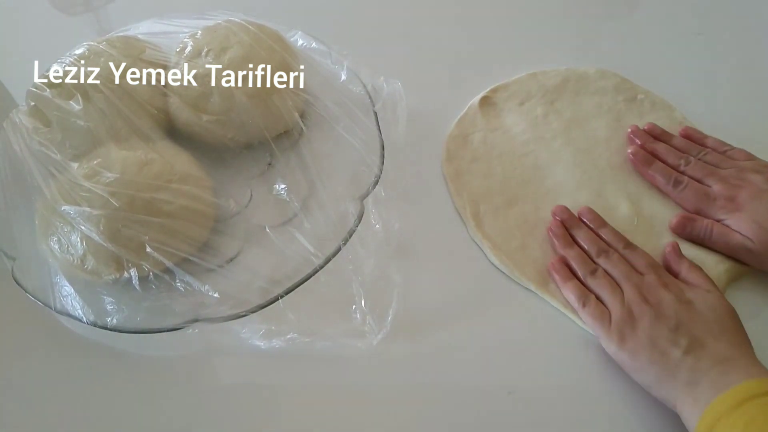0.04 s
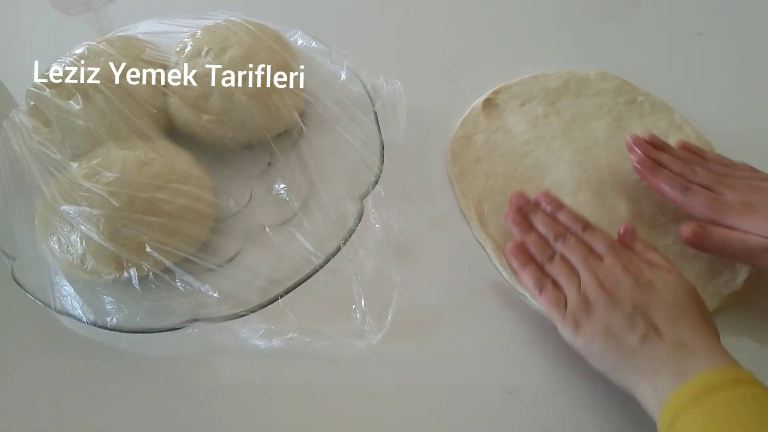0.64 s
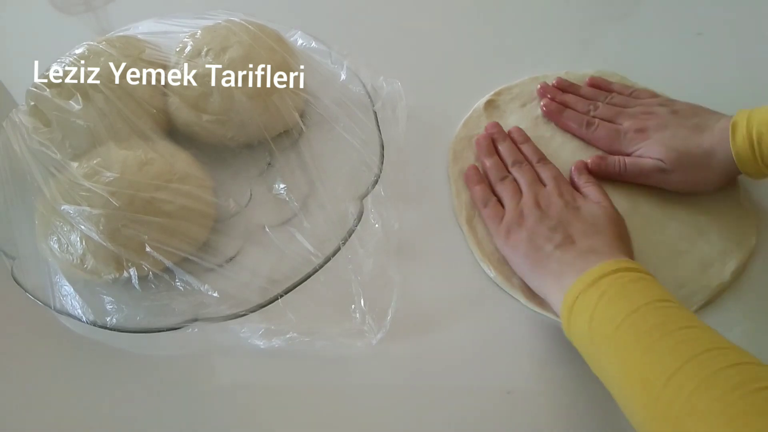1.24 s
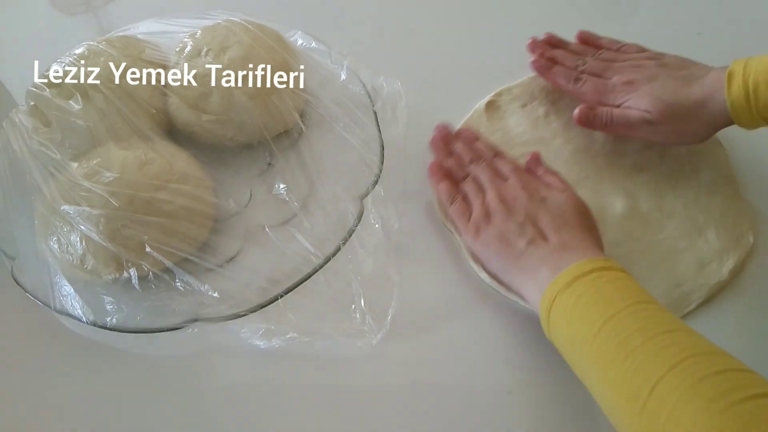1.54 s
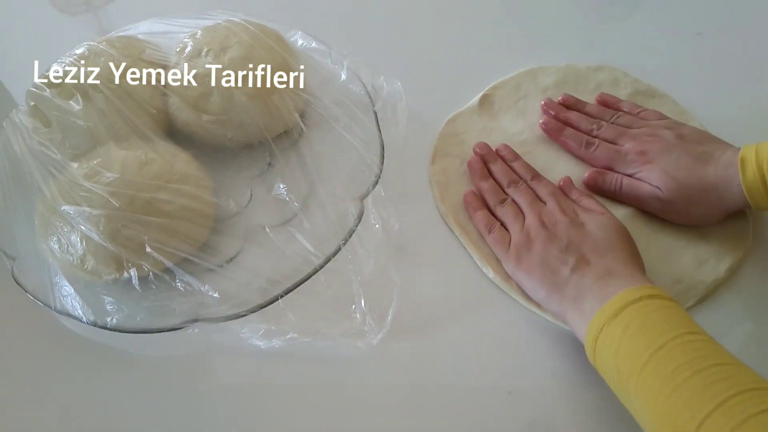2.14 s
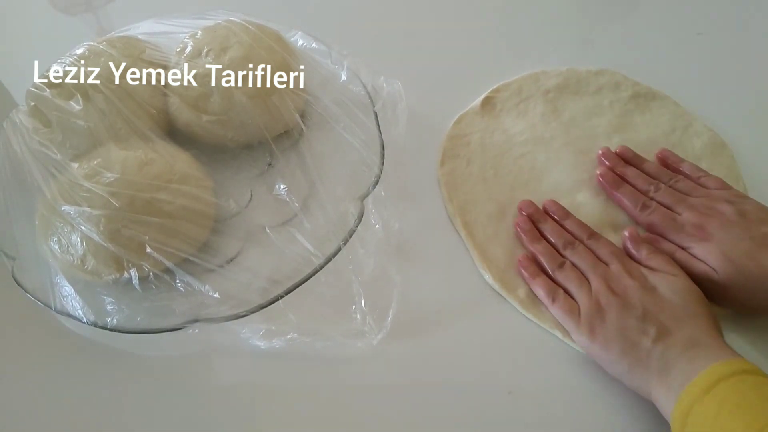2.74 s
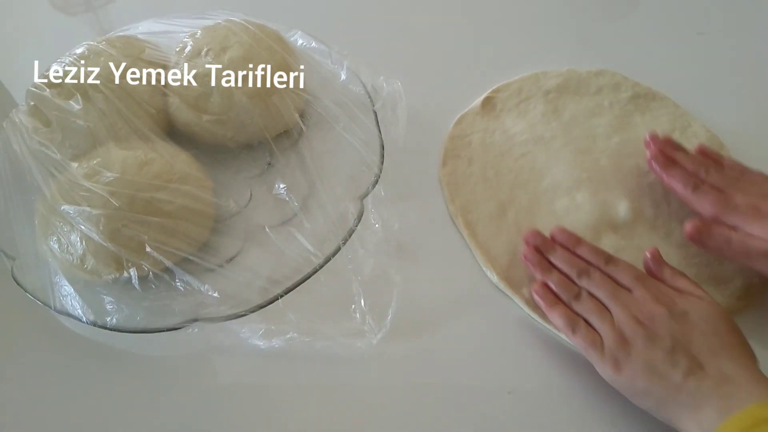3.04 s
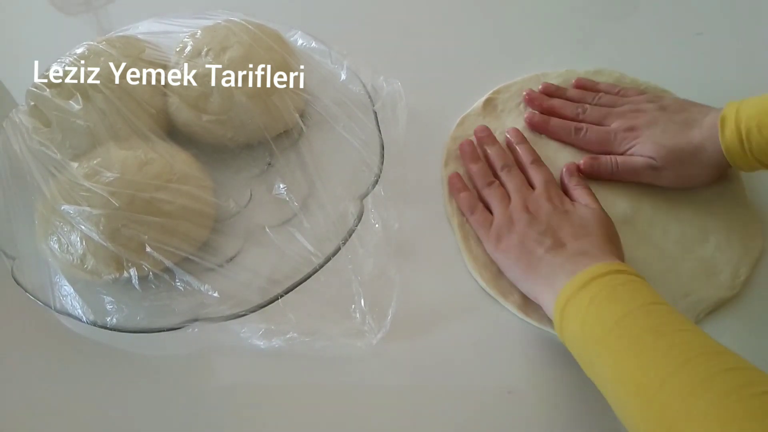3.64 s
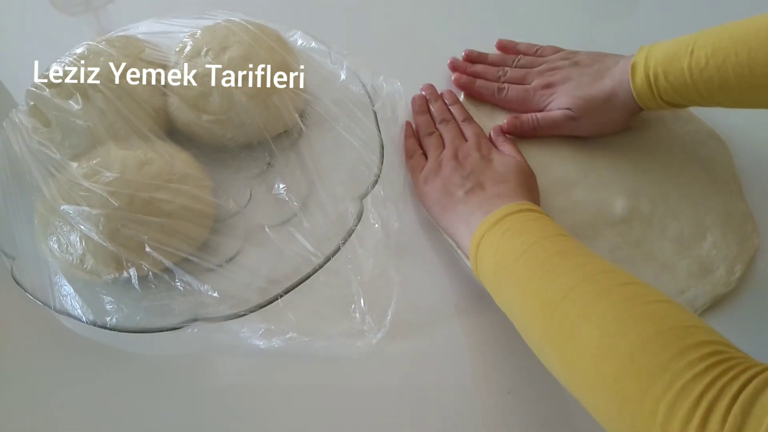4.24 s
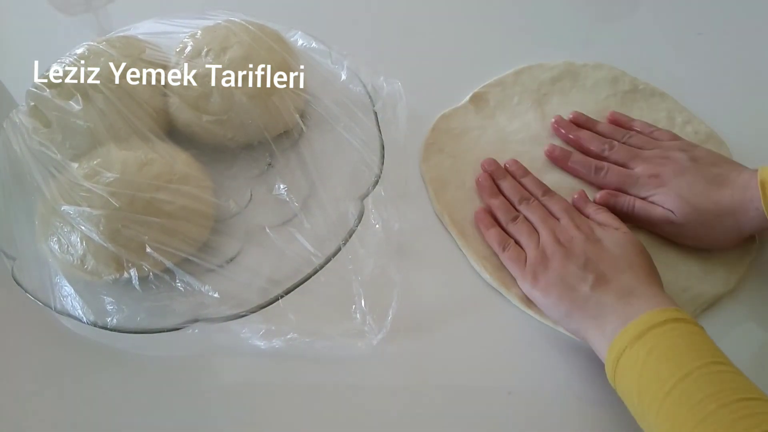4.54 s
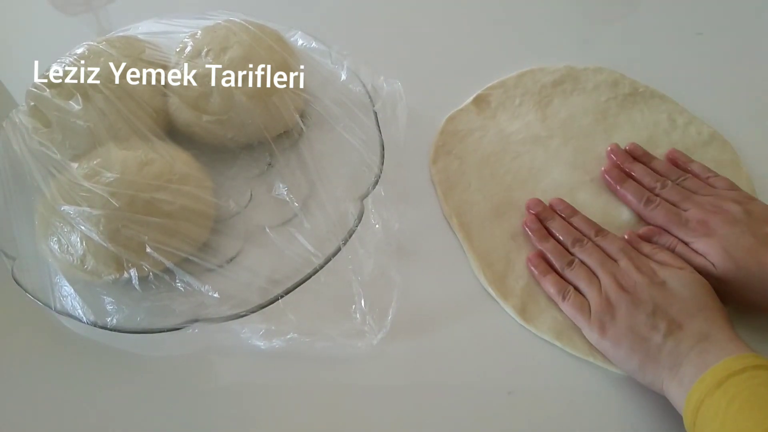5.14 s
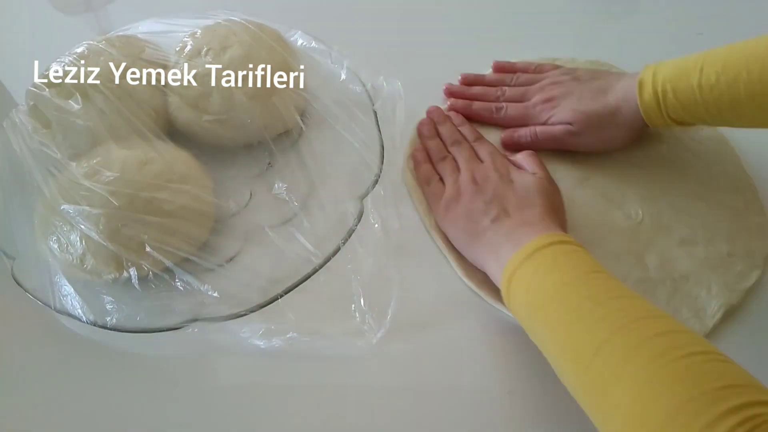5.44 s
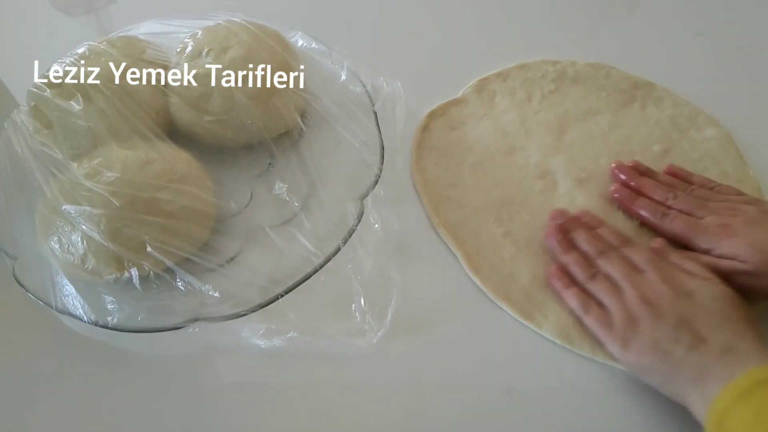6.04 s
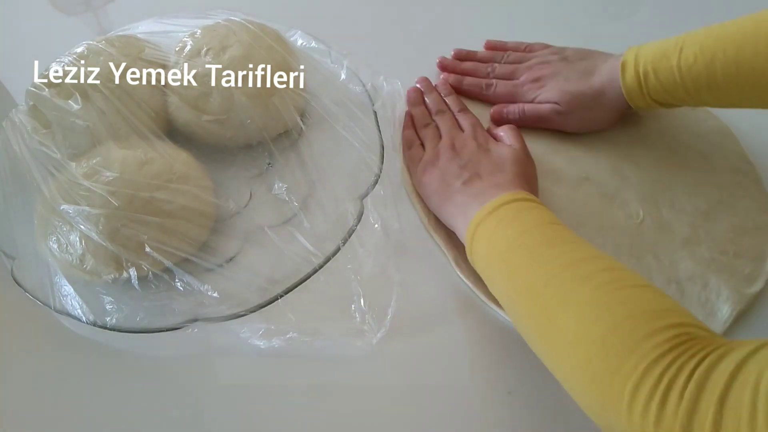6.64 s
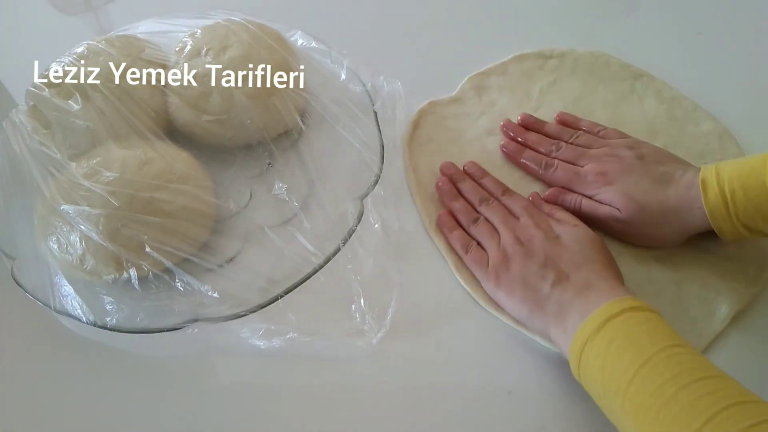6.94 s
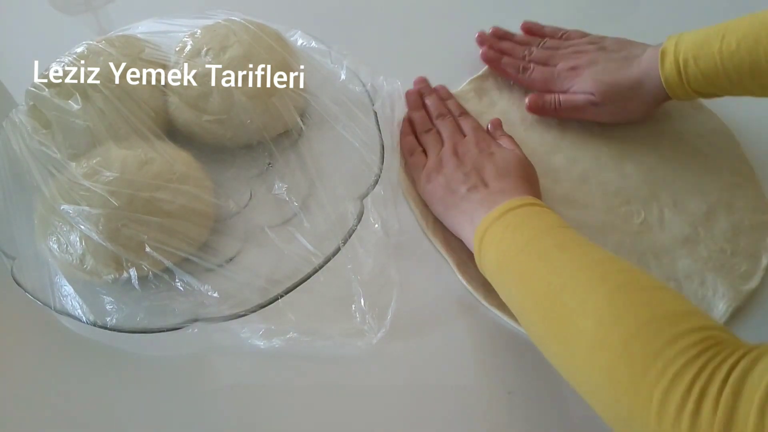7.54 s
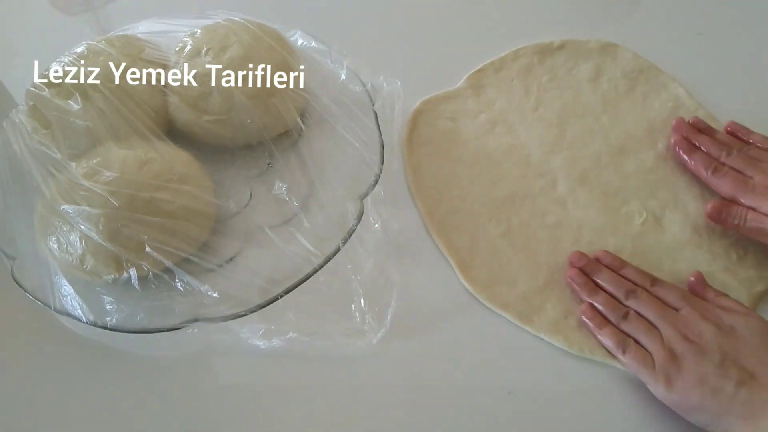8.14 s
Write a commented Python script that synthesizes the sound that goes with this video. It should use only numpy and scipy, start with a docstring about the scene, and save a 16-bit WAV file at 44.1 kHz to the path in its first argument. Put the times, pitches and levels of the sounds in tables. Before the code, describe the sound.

Close to the microphone, palms and fingers press and slap greasy dough in a small, quiet kitchen with a faint hum. Soft thumps and wet smacks come unevenly, about two a second, mixed with little pops, sticky crackles and a faint rub of skin on oil. About two thirds through, the patting turns quick and drier, then finishes with a few lighter pats and a last peel of the fingers.

```python
"""Two hands pat a round of oiled dough flat on a kitchen worktop, close up, over faint air and mains hum.
Slow pats come first: each a soft thud that sets worktop and room ringing, with a smack where the
fingers land; in full pats the palm follows. In between, skin slides on the oil, tiny air pockets snap
and sticky fingers peel off. At about 5.5 s the background dips briefly, then the pats come twice as
fast and sound drier, ending in a few light ones and a last peel."""
import sys
import numpy as np
from scipy import signal
from scipy.fft import rfft, irfft
from scipy.io import wavfile
from scipy.ndimage import uniform_filter1d

SR = 44100
rng = np.random.default_rng(int(sys.argv[2]) if len(sys.argv) > 2 else 0)


def bounce(signal):
    """Save signal as a 16-bit WAV file at the path given by the first command-line argument."""
    frames = np.transpose(np.atleast_2d(signal))
    limited = np.clip(frames, -1, 1)
    pcm = np.round(limited * 32767).astype(np.int16)
    wavfile.write(sys.argv[1], SR, pcm)


N = 369999

# fingers landing on the dough: (time [s], thud [dB], knock [dB], smack [dB], hollow under the hand [dB],
# pitch of the squeezed air [Hz], brightness [dB/octave])
PATS = [(0.3415, -30, -34.5, -29.5, -35, 1610, -2.5), (0.763, -33.5, -57, -35.5, -44, 3170, -3.5),
        (1.2455, -23, -32, -37, -43.5, 1840, 1.5), (1.6669, -34.5, -50.5, -41, -59.5, 3360, -1.5),
        (2.147, -46, -59.5, -49.5, -61.5, 1300, -3), (2.6689, -44.5, -64, -59, -52, 5180, 5.5),
        (3.2166, -35.5, -41, -46.5, -51.5, 1830, -3.5), (3.664, -26, -41, -40.5, -54, 2430, -5),
        (4.044, -41.5, -59, -55.5, -57.5, 3830, 2), (5.1661, -40.5, -54.5, -47.5, -47.5, 4540, -3),
        (5.491, -52, -58, -88, -62.5, 1450, -5), (5.677, -40.5, -49.5, -55, -73, 1290, -7.5),
        (5.862, -35, -41, -38.5, -41.5, 2030, 0.5), (6.0882, -35.5, -48, -39, -49, 1470, 2),
        (6.2831, -27, -38, -38.5, -38.5, 3160, -3.5), (6.4417, -29.5, -39, -34, -47.5, 1610, 5),
        (6.6312, -34.5, -46.5, -44.5, -50, 2700, -3), (6.8015, -28, -42, -30.5, -34, 2980, -5.5),
        (6.98, -37, -50.5, -43.5, -54.5, 2440, -7), (7.2294, -32.5, -51.5, -43, -55, 4130, 0),
        (7.4028, -36.5, -44.5, -42, -54, 2120, -3), (7.6075, -47, -50.5, -52, -53.5, 2480, 0),
        (7.818, -39, -50.5, -50, -56, 1440, -0.5), (8.028, -39, -52.5, -49, -64, 1380, -2),
        (8.2556, -38, -41, -48.5, -56, 1550, -2)]
QUICK_FROM_S = 5.47  # the quick, drier pats start here


def amp(db):
    """Decibels to gain."""
    return 10 ** (np.asarray(db) / 20)


def unit(x):
    """Scales to an energy of 1."""
    return x / np.sqrt(np.sum(x ** 2) + 1e-20)


def curve(points, hz):
    """Reads a table along a log-frequency axis."""
    point_hz, value = np.transpose(points)
    return np.interp(np.log(hz + 1), np.log(point_hz + 1), value)


def bump(hz, centre, width):
    """A resonance of height 1 on a log-frequency axis."""
    return 1 / (1 + (np.log((hz + 1) / centre) / width) ** 2)


def add(mix, s, sound):
    """Mixes a sound in at time s."""
    start = round(s * SR)
    sound = sound[max(-start, 0):]
    part = mix[max(start, 0):][:len(sound)]
    part += sound[:len(part)]


def colour(x, gain_db):
    """Minimum-phase EQ: the ring follows each click and never precedes it."""
    log_gain = np.log(amp(np.r_[gain_db, gain_db[-2:0:-1]]))
    response = np.exp(np.conj(signal.hilbert(log_gain)))[:len(gain_db)]
    return irfft(rfft(x) * response, len(x))


def room_tone(air_db=-80, dip_s=5.48, dip_db=-16, recovery_s=0.054):
    """Still air and a faint mains hum; both dip briefly as the quick pats begin."""
    # colour of the room air: (frequency [Hz], gain [dB])
    air_eq = [(25, 1), (55, 18.5), (110, 7), (250, 1), (450, 2), (1500, -2), (3000, -4.5), (6000, -8),
              (12500, -10.5), (13500, -18), (16000, -23)]
    # partials of the hum: (frequency [Hz], level [dB])
    partials = [(98, -90), (146, -86.5), (194, -94.5), (243, -89.5), (291, -93.5)]
    hz, t = np.fft.rfftfreq(N, 1 / SR), np.arange(N) / SR
    air = irfft(rfft(rng.standard_normal(N)) * amp(curve(air_eq, hz)), N)
    hum = sum(np.sqrt(2) * amp(db) * np.sin(2 * np.pi * (f * t + rng.random())) for f, db in partials)
    dip = (t > dip_s) * np.exp(-abs(t - dip_s) / recovery_s)
    return amp(dip_db * dip) * (hum + amp(air_db) * air / air.std())


def creases(hz, count=26):
    """Small chance resonances of the folds between the fingers, in dB."""
    centre, height = rng.random((2, count, 1))
    ripple_db = ((18 * height - 9) * bump(hz, 1100 * 13 ** centre, .04)).sum(0)
    return np.minimum(ripple_db, 7)  # cap the random peaks so no narrow tone sticks out


def palm_slides(catch_db=4, grains_per_s=2500):
    """Skin gliding on oil: a fine high crackle that catches and lets go, each stroke its own colour."""
    # strokes over the dough: (middle [s], length [s], level [dB])
    strokes = [(0.17, 0.34, -82), (0.582, 0.11, -79.5), (1.068, 0.11, -70.5), (1.514, 0.24, -80.5),
               (1.93, 0.26, -76.5), (2.513, 0.085, -69.5), (2.924, 0.26, -78.5), (3.472, 0.18, -77),
               (3.889, .21, -71.5), (4.369, 0.14, -70), (4.973, 0.12, -68.5), (7.787, 0.11, -62),
               (8.149, 0.053, -69)]
    # colour of rubbing skin: (frequency [Hz], gain [dB])
    rub_eq = [(1500, -26), (3000, -11.5), (7000, -13.5), (11000, -3), (13000, 0), (14500, 1), (16000, -10)]
    out = np.zeros(N)
    for s, length, db in strokes:
        size = 2 * round(length * SR / 2)
        hz = np.fft.rfftfreq(size, 1 / SR)
        catches = uniform_filter1d(rng.standard_normal(size), 400)
        grains = rng.standard_normal(size) * (rng.random(size) < grains_per_s / SR)
        grains *= amp(catch_db * catches / catches.std())
        rustle = colour(grains, curve(rub_eq, hz) + creases(hz))
        add(out, s - length / 2, amp(db) * np.hanning(size) * rustle / rustle.std())
    return out


def push(t, hz, crest_s):
    """A heavily damped swing that builds while the dough yields."""
    u = t / crest_s
    return -u ** 2 * np.exp(2 * (1 - u)) * np.sin(2 * np.pi * hz * t)


def dough_thuds(lead_s=0.00398, usual_thud_db=-37.5, swell_s=0.036, slow_t60=0.43, quick_t60=0.24):
    """The hand's weight thuds through the dough; worktop and room swell after it and die away."""
    # a hand leaning on the dough with no smack: (time [s], thud [dB])
    presses = [(0.001, -53.5), (0.964, -55), (1.066, -48), (3.177, -49.5), (3.475, -54.5), (3.565, -57.5),
               (4.523, -55), (7.843, -36), (7.997, -42.5)]
    # low modes of worktop and room: (frequency [Hz], gain [dB], ring time [factor])
    modes = [(63.4, -15.5, 0.83), (79.8, -12, 0.99), (98.1, -9, 1.15), (123.67, -0.5, 0.79),
             (138.45, -9, 1.28), (189.9, 4.5, 0.68), (199.4, -7, 0.55), (222.1, -9.5, 0.9),
             (248.1, -7, 0.76), (287.4, -15.5, 0.7), (317.6, -18, 0.62), (363.8, -17, 0.46)]
    mode_hz, mode_db, lasting = np.transpose(modes)[:, :, None]
    # the dough starts to yield just before the skin closes on it
    landings = [(s - lead_s, thud, knock) for s, thud, knock, *_ in PATS]
    landings += [(s, thud, thud - 20) for s, thud in presses]  # a soft press barely knocks
    out, t = np.zeros(N), np.arange(SR) / SR
    for s, thud, knock in landings:
        weight_db = thud - usual_thud_db
        crest_s = 0.011 * 2 ** (weight_db / 45)  # a heavier hand sinks in for longer
        ring_db = 2.17 - 0.16 * weight_db  # and damps the ring more
        blow = amp(thud) * push(t, hz=108.3, crest_s=crest_s)
        blow += amp(thud / 2 - 44) * push(t, hz=46, crest_s=0.026)  # even a light pat sways the worktop
        blow += amp(knock + 3) * push(t, hz=205, crest_s=0.0068)
        # a flat soft hand feeds the lowest modes, a firmer one the upper; each spot a little differently
        drive_db = np.where(mode_hz < 160, thud, knock + 6) + 2.5 * rng.standard_normal(mode_hz.shape)
        t60 = (slow_t60 if s < QUICK_FROM_S else quick_t60) * lasting
        ring = (amp(drive_db + mode_db - 60 * t / t60) * np.sin(2 * np.pi * mode_hz * t)).sum(0)
        swell = 1 - np.exp(-(t / swell_s) ** 2)
        add(out, s, blow + amp(ring_db) * ring * swell)
    return out


def oil_bridges(contacts, *, skin_db, hollow_db, fizz_db, grains_per_s, grain_db, hiss,
                attack_ratio, halo, gap_db, gap_width, cup_db, crease_depth):
    """A swarm of tiny oil bridges breaking, coloured by the air gaps between skin and dough."""
    # midrange smack of the skin: (frequency [Hz], gain [dB])
    skin_eq = [(300, -39.5), (700, -10), (1000, 1.5), (1800, -0.5), (3100, -3), (4200, -5.5), (6000, -12),
               (10000, -41.5)]
    # low body of the hollow under the hand: (frequency [Hz], gain [dB])
    hollow_eq = [(120, -33.5), (260, 3.5), (380, 0), (560, -1.5), (800, -7), (1300, -21), (3000, -60.5)]
    # wet fizz on top: (frequency [Hz], gain [dB])
    fizz_eq = [(2000, -35.5), (4500, -11.5), (5600, 1), (8000, 5.5), (10500, 0.5), (12500, 3),
               (14500, -0.5), (16000, 3.5)]
    out, size = np.zeros(N), 8192
    t, hz = (np.arange(size) - size // 2) / SR, np.fft.rfftfreq(size, 1 / SR)
    for s, skin, hollow, fizz, hollow_hz, gap_hz, spread_s, tilt in contacts:
        # bridges break at random, a few of them large
        breaks = (rng.random(size) < grains_per_s / SR) * rng.choice([-1, 1], size)
        breaks = breaks * amp(grain_db * np.minimum(rng.exponential(1, size), 4))
        envelope = 1 / np.cosh(t / (spread_s * np.where(t < 0, attack_ratio, 1)))
        envelope += halo * np.exp(-abs(t) / 0.005)  # a faint swell softens the edges of short bursts
        swarm = (unit(breaks) + hiss * unit(rng.standard_normal(size))) * envelope
        folds_db = crease_depth * creases(hz)
        # the squeezed air rings at its pitch and, more weakly, at one overtone
        gap = bump(hz, gap_hz, gap_width) + .5 * bump(hz, 1.7 * gap_hz, gap_width / 2)
        skin_tone = curve(skin_eq, hz) + gap_db * gap + tilt * np.log2(hz + 1) + folds_db
        hollow_tone = curve(hollow_eq, hz) + cup_db * bump(hz, hollow_hz, width=0.34)
        sound = amp(skin + skin_db) * unit(colour(swarm, skin_tone))
        sound += amp(hollow + hollow_db) * unit(colour(swarm, hollow_tone))
        sound += amp(fizz + fizz_db) * unit(colour(swarm, curve(fizz_eq, hz) + folds_db))
        add(out, s + t[0], sound)
    return out


def pocket_snaps(hollow_hz=620, spread_s=0.0015):
    """Tiny air pockets all burst equally fast; their size sets the pitch."""
    # pockets snapping open: (time [s], level [dB], fizz [dB], pitch [Hz])
    snaps = [(0.035, -55.5, -74, 2750), (0.457, -49.5, -85, 1760), (1.0776, -29.5, -49.5, 2130),
             (3.9578, -50.5, -94, 1770), (4.7462, -35, -66, 2580), (4.8107, -30.5, -55.5, 3040),
             (4.934, -62.5, -67, 1700), (6.1765, -39.5, -96, 3120), (6.3838, -33, -64, 1070),
             (6.9073, -43.5, -65, 1520), (7.0279, -31, -47, 5040), (7.0794, -28.5, -51.5, 2700),
             (7.108, -71, -63, 3030), (8.085, -56, -72, 3170), (8.1302, -42, -70, 2560)]
    contacts = [(s, db, db - 21, fizz, hollow_hz, hz, spread_s, 0) for s, db, fizz, hz in snaps]
    return oil_bridges(
        contacts, skin_db=7, hollow_db=10.5, fizz_db=22, grains_per_s=3400, grain_db=-4, hiss=1,
        attack_ratio=0.77, halo=0.03, gap_db=15, gap_width=0.21, cup_db=23, crease_depth=0.6)


def finger_peels(hollow_hz=700):
    """Sticky fingers lift off with a sparse, pitched crackle and only a small, weak hollow."""
    # fingers leaving the dough: (time [s], level [dB], fizz [dB], air gap pitch [Hz], spread [s])
    peels = [(0.195, -66, -85, 1120, 0.01), (0.456, -55, -73, 1830, 0.013),
             (0.6074, -61.5, -76, 4760, 0.0069), (1.0904, -41.5, -58.5, 2380, 0.011),
             (1.5372, -61, -92, 1800, 0.011), (2.0155, -68.5, -84, 5100, 0.012),
             (2.5179, -55.5, -69, 1910, .01), (3.043, -54.5, -65.5, 1126, .0076),
             (3.485, -48.5, -59, 2070, 0.0069), (4.3799, -56, -65, 2170, 0.018),
             (4.561, -63, -91, 920, 0.017), (4.7655, -48.5, -64, 2330, 0.0094),
             (4.9903, -48, -66, 1780, 0.0077), (5.274, -57.5, -69, 3600, .005),
             (5.362, -61.5, -55.5, 2720, 0.023), (6.2148, -62.5, -79, 1710, .004),
             (6.39, -45.5, -52, 1800, 0.0081), (7.0369, -39, -50, 3220, 0.0045),
             (7.3526, -52, -63, 1290, 0.0068), (7.784, -60.5, -62, 4740, 0.0078),
             (7.859, -43, -58, 5480, 0.0053), (8.1303, -49, -59.5, 2840, 0.0091),
             (8.3684, -63.5, -69.5, 4830, 0.0058)]
    contacts = [(s, db, db - 14, fizz, hollow_hz, hz, spread, 0) for s, db, fizz, hz, spread in peels]
    return oil_bridges(
        contacts, skin_db=19, hollow_db=20.5, fizz_db=22, grains_per_s=800, grain_db=4.5, hiss=0.39,
        attack_ratio=0.81, halo=0.023, gap_db=21, gap_width=0.17, cup_db=19, crease_depth=0.75)


def finger_contacts(usual_smack_db=-46.5, usual_knock_db=-50.5):
    """Faster fingers smack louder and shorter; the hollow sounds deeper in quick or firm pats."""
    contacts = []
    for s, _, knock, smack, hollow, gap_hz, tilt in PATS:
        spread_s = min(0.0023 * 2 ** ((usual_smack_db - smack) / 16.5), 0.0075)
        usual_hollow_hz = 557 if s < QUICK_FROM_S else 329
        hollow_hz = usual_hollow_hz * 2 ** ((usual_knock_db - knock) / 66)
        fizz = smack - 24 + 0.87 * tilt
        contacts.append((s, smack, hollow, fizz, hollow_hz, gap_hz, spread_s, tilt))
    return contacts


def hand_smacks():
    """Flat fingers and palm slap the oil in a dense, faintly pitched burst."""
    contacts = finger_contacts() + palm_contacts()
    return oil_bridges(
        contacts, skin_db=15, hollow_db=21, fizz_db=26.5, grains_per_s=3000, grain_db=5, hiss=0.52,
        attack_ratio=1, halo=0.053, gap_db=9, gap_width=0.17, cup_db=13, crease_depth=0.45)


def palm_contacts(hollow_hz=420, gap_hz=1773, spread_s=0.0016, tilt=4):
    """The palm always traps about the same pocket of air: hollower and brighter than the fingers."""
    # the palm closing just after the fingers: (time [s], level [dB])
    palms = [(1.2561, -32), (3.229, -40), (3.6744, -39), (5.8722, -55), (6.2907, -39.5), (6.4565, -34.5),
             (7.2405, -48.5), (8.2671, -57.5)]
    return [(s, db, db - 3, db - 21, hollow_hz, gap_hz, spread_s, tilt) for s, db in palms]


def kitchen(x, decay_scale, predelay_s=0.0046):
    """Dense reflections of a small hard room, the bass ringing longest."""
    # reverb decay: (frequency [Hz], time to fall 60 dB [s])
    decay_times = [(100, 0.7), (400, 0.31), (1100, 0.28), (3000, 0.25), (8000, 0.26), (15000, 0.43)]
    t = np.arange(SR) / SR
    taps = rng.choice([-1., 1.], SR) * (rng.random(SR) < .12) * (t > predelay_s)
    hz, when, bands = signal.stft(taps, SR, nperseg=256)
    t60 = decay_scale * curve(decay_times, hz)[:, None]
    _, tail = signal.istft(bands * amp(-60 * when / t60), SR, nperseg=256)
    return signal.fftconvolve(x, unit(tail))[:N]


def scene(quick_decay_scale=0.51):
    """All the hand sounds come from one spot, and the kitchen answers them."""
    thuds, slides = dough_thuds(), palm_slides()
    smacks, peels, snaps = hand_smacks(), finger_peels(), pocket_snaps()
    send = amp(-12) * thuds + amp(-1) * smacks + amp(-3) * (peels + slides + snaps)
    slow = np.arange(N) < QUICK_FROM_S * SR
    reverb = kitchen(send * slow, decay_scale=1) + amp(-0.5) * kitchen(send * ~slow, quick_decay_scale)
    # a faint treble shimmer gives slight stereo width
    highpass = signal.butter(8, 4500, "high", fs=SR, output="sos")
    side = amp(-9) * signal.sosfilt(highpass, kitchen(send, quick_decay_scale))
    mid = thuds + smacks + peels + snaps + slides + reverb + room_tone()
    return np.array([mid + side, mid - side])


def record(dry, cutoff_hz=15900):
    """A steep low-pass trims the very top."""
    lowpass = signal.firwin(511, cutoff_hz, window=("kaiser", 9), fs=SR)
    return signal.oaconvolve(dry, lowpass[None], "same")


dry = scene()
out = record(dry)
bounce(out)
```